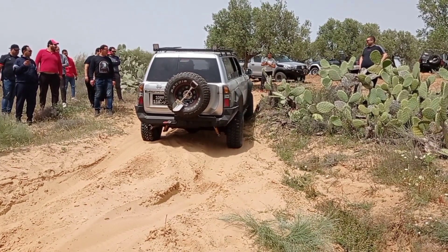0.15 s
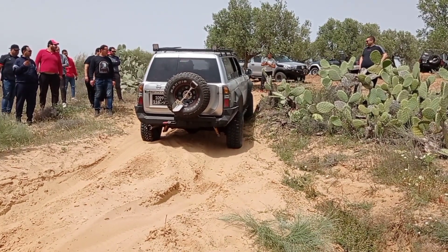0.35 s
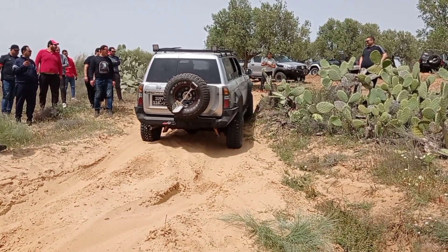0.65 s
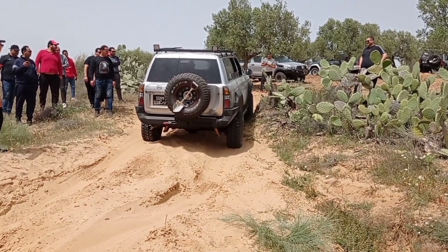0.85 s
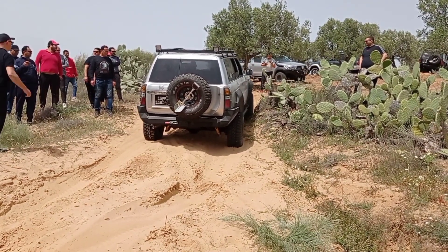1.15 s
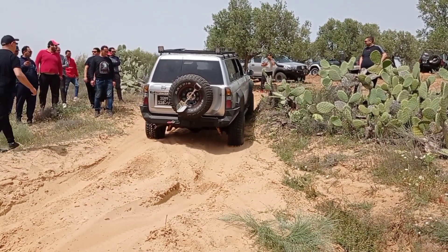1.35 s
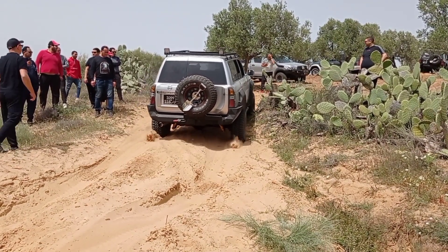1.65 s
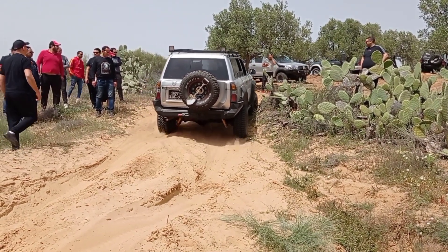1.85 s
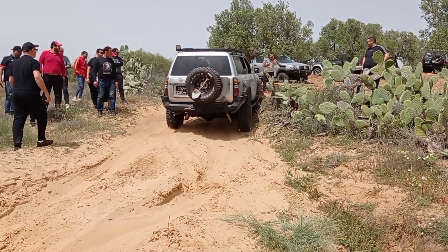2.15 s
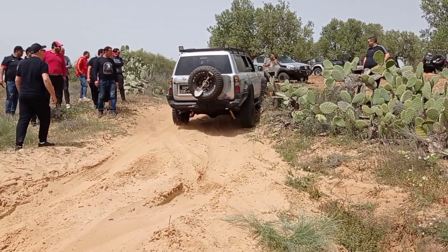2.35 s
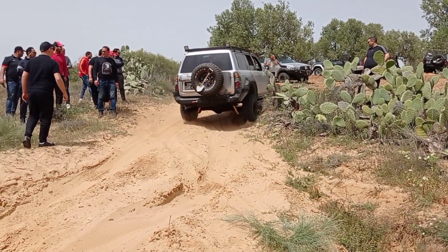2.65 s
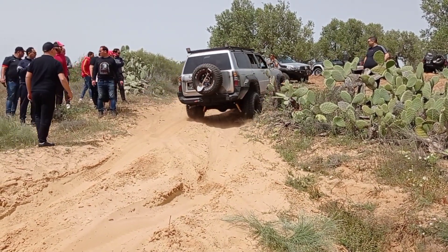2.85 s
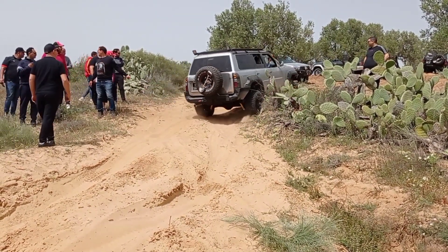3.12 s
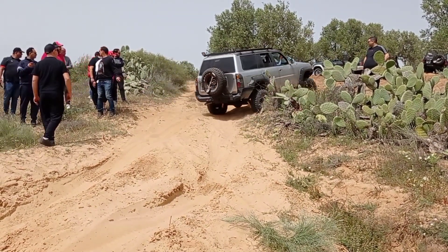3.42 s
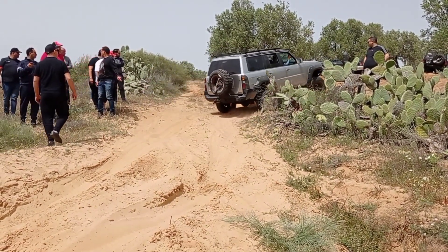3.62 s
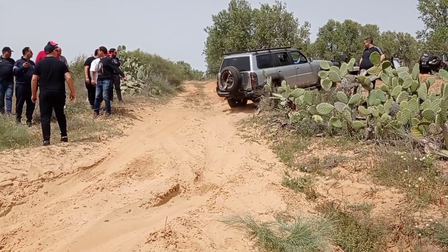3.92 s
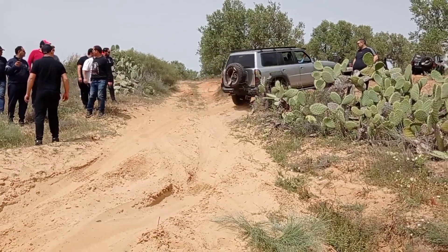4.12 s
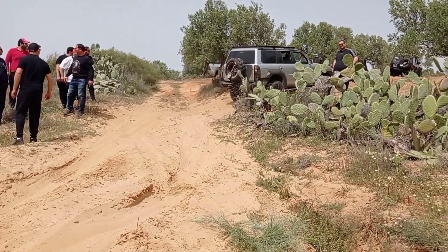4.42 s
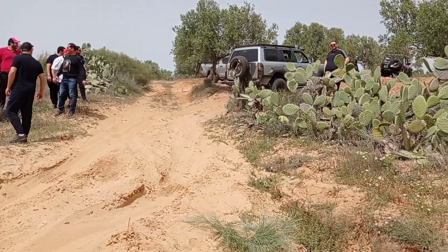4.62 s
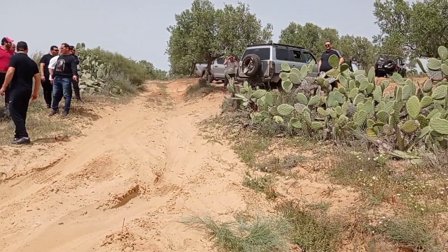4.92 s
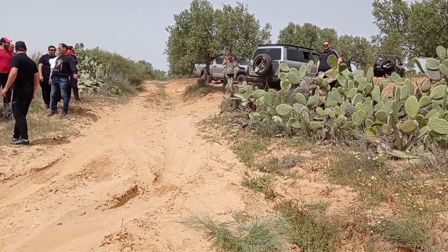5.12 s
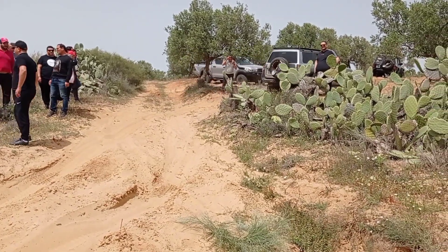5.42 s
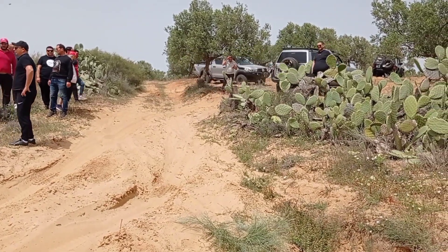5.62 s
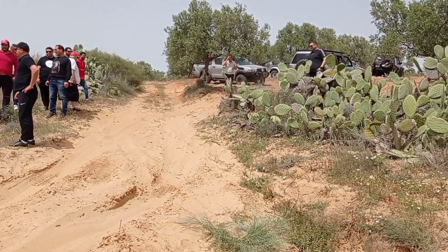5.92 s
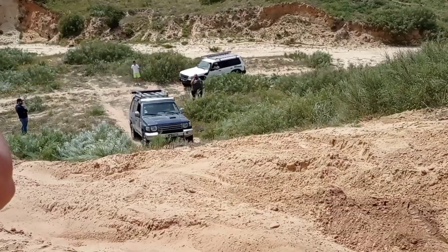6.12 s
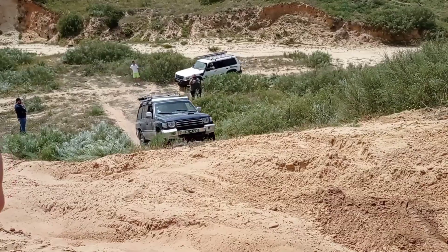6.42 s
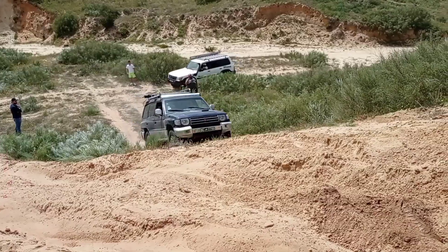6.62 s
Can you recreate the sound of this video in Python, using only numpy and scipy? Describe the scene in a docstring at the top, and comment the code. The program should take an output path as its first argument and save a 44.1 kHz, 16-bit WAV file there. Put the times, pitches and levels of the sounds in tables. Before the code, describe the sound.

An off-road vehicle labours up a sand track in the open air, its exhaust booming and its engine clattering at high, surging revs while the tyres spray sand. Wind rumbles and thumps on the microphone. The chassis gives one short squeak, then the revs sink and the engine fades. A second vehicle, farther away, lugs at low revs and accelerates uphill towards the listener with two faint ticks.

```python
"""A six-cylinder off-roader labours up a sand track at high revs: the exhaust booms, the engine
clatters, the tyres throw sand, wind buffets the microphone. From 1.35 s it turns side-on; at 2.7 s
the chassis squeaks; from 3.9 s it passes behind cactus and eases off. At 5.8 s a second one, farther
away, lugs at low revs; from 6.3 s it accelerates uphill towards the listener, with two diesel ticks."""
import sys
import numpy as np
from scipy import signal
from scipy.fft import rfft, irfft, next_fast_len
from scipy.io import wavfile
from scipy.ndimage import uniform_filter1d, map_coordinates

SR = 44100
rng = np.random.default_rng(int(sys.argv[2]) if len(sys.argv) > 2 else 0)


def materialize(psi):
    """Save the field psi as 16-bit PCM at rate SR to the path in sys.argv[1].

    A 1-D psi becomes a single channel; in a 2-D psi each row is a channel.
    """
    bounded = np.clip(np.atleast_2d(psi).T, -1, 1)
    quanta = np.round(bounded * 32767).astype(np.int16)
    wavfile.write(sys.argv[1], SR, quanta)


N = 298116

# Engine load, drives machinery and sand: t/s, level/dB
LOAD = [(0.0, -37), (0.43, -33.5), (0.66, -36), (0.92, -36), (1.2, -40.5), (1.75, -36.5), (1.98, -39),
        (2.28, -35), (2.5, -38), (2.92, -34), (3.54, -34.5), (3.75, -40), (4.12, -40), (4.95, -48),
        (5.21, -46), (5.65, -57), (6.4, -54.5), (6.76, -45)]
TURN_S = (1.35, 1.33)  # swing side-on: start, duration
SHADOW_S = (3.94, 1.0)  # slip behind cactus: start, duration; the loss stays for the distant car


def amp(db):
    """Decibels to gain."""
    return 10 ** (np.asarray(db) / 20)


def unit(x):
    """Scale to rms 1."""
    return x / np.sqrt(np.mean(x ** 2) + 1e-20)


def clock():
    """Sample times in s."""
    return np.arange(N) / SR


def curves(rows):
    """Per-sample values of each column after the time."""
    times_s, *cols = np.transpose(rows)
    return [np.interp(clock(), times_s, col) for col in cols]


def ease(start_s, length_s):
    """Smooth step, 0 to 1."""
    return np.sin(np.pi / 2 * np.clip((clock() - start_s) / length_s, 0, 1)) ** 2


def bump(at_s, half_s):
    """Gaussian envelope, peak 1."""
    return np.exp(-((clock() - at_s) / half_s) ** 2)


def bell(hz, centre_hz, half_hz):
    """Nearness to a resonance, 0 to 1."""
    return 1 / (1 + ((hz - centre_hz) / half_hz) ** 2)


def by_view(rear_db, side_db):
    """Level glide as the car turns."""
    return rear_db + (side_db - rear_db) * ease(*TURN_S)


def noise():
    """White noise."""
    return rng.standard_normal(N)


def wobble(rate_hz):
    """Smooth random curve, knots at rate_hz."""
    knots = rng.standard_normal(int(N * rate_hz / SR) + 4)
    steps = np.linspace(0, len(knots) - 1, 10 * len(knots))
    return np.interp(clock() * rate_hz, steps, map_coordinates(knots, [steps]))


def filtered(x, response):
    """Apply a frequency response."""
    size = next_fast_len(len(x) + 8192)
    return irfft(rfft(x, size) * response(np.fft.rfftfreq(size, 1 / SR)), size)[:len(x)]


def coloured(x, spectrum):
    """Shape x by rows of f/Hz, level/dB; rms 1."""
    points_hz, db = np.transpose(spectrum)
    return unit(filtered(x, lambda hz: amp(np.interp(np.log(hz + 1), np.log(points_hz), db))))


def patchy(x, depth_db, size=512):
    """Shifting reflections: narrow bands swell and fade independently."""
    bands = signal.stft(x, nperseg=size)[2]
    field = uniform_filter1d(rng.standard_normal(bands.shape), size=2, axis=0)
    for _ in range(2):
        field = uniform_filter1d(field, size=SR // (4 * size) + 1, axis=1)
    return signal.istft(bands * amp(depth_db * unit(field)), nperseg=size)[1][:N]


def firings(rate_hz, flywheel_s=0.0904, flutter=0.00198):
    """Running firing count; the flywheel smooths the speed."""
    smooth_hz = uniform_filter1d(rate_hz, int(flywheel_s * SR), mode="nearest")
    return np.cumsum(smooth_hz * (1 + flutter * wobble(30))) / SR


def boom(fired, tone_db, octave_db):
    """The silencer passes mainly the firing tone and its octave."""
    tone = amp(tone_db + 0.37 * wobble(24.9)) * np.sin(2 * np.pi * fired)
    octave = amp(octave_db + 0.99 * wobble(16)) * np.sin(4 * np.pi * fired)
    return np.sqrt(2) * (tone + octave)


def drone(cycle, waver_db=3.0):
    """Unequal cylinders add wavering lines, lifted by the tailpipe resonance, over rushing gas."""
    # Exhaust lines: multiple of the cycle rate, level/dB
    orders = [(3, 4), (4, 4.5), (5, 6.5), (7, 10.5), (8, 7), (10, 0.5), (11, -6), (13, -17), (14, -4.5),
              (15, 1.5), (16, -7), (17, -17), (18, 5), (19, -26), (20, 0.5), (21, -6), (22, -17.5),
              (23, -8.5), (24, -2), (26, -7), (27, -9), (30, -9)]
    # Growl as the engine is dragged down: t/s, tilt/(dB/octave)
    growl = [(0, -4), (1.2, -3.5), (2.2, 2.5), (3.4, .5), (4.6, 4), (5.8, 3.5), (6.76, 0.5)]
    tilt_db, = curves(growl)
    cycle_hz = np.gradient(cycle) * SR
    lines = np.zeros(N)
    for order, db in orders:
        tailpipe_db = 2.9 * bell(order * cycle_hz, centre_hz=500, half_hz=230)
        growl_db = tilt_db * np.log2(max(order, 8) / 16)
        gain = amp(db + tailpipe_db + growl_db + waver_db * wobble(5))
        lines += gain * np.sin(2 * np.pi * (order * cycle + rng.random()) + 0.22 * wobble(5))
    gas = coloured(noise(), [(120, -22), (280, -20), (450, 4.5), (650, -0.5), (1000, -9.5), (2500, -69)])
    return unit(lines) + amp(-14) * gas


def climber(fired, rate_hz, droning, pull_db_s_per_hz=0.0486, pull_lag_s=0.44):
    """First exhaust: bank beat and drone follow the boom; the drone also swells with rising revs."""
    # Firing tone: t/s, level/dB
    tone = [(0.0, -18), (0.5, -14.5), (0.59, -19), (0.89, -22), (1.11, -17.5), (1.42, -26), (1.5, -20),
            (2.32, -15.5), (2.52, -20.3), (3.25, -19), (3.58, -15.5), (3.7, -20), (3.85, -19), (4.08, -20),
            (4.38, -16), (4.64, -16), (4.73, -22.5), (4.98, -24.5), (5.24, -19), (5.8, -39.5)]
    # Its octave: t/s, level/dB
    octave = [(0, -42.5), (2.4, -46), (2.75, -35), (3.05, -40), (3.45, -35), (3.68, -35), (3.84, -21),
              (4.08, -35), (4.25, -29), (4.64, -28.5), (4.78, -46.5), (5.8, -40)]
    tone_db, = curves(tone)
    push_db = tone_db + 18  # re full boom
    rise_hz_per_s = uniform_filter1d(np.gradient(rate_hz) * SR, int(pull_lag_s * SR), mode="nearest")
    beat = np.sqrt(2) * np.sin(3 * np.pi * fired)  # two unequal banks: 1.5 x firing rate
    beat_db = by_view(-37.5, -33) + 0.69 * push_db + 1.6 * wobble(10)
    drone_db = by_view(-35, -31) + 0.94 * push_db + pull_db_s_per_hz * rise_hz_per_s
    return boom(fired, tone_db, curves(octave)[0]) + amp(beat_db) * beat + amp(drone_db) * droning


def cycle_pattern(cycle, drift_hz, size=512):
    """Slowly drifting random pattern, repeated each engine cycle."""
    patterns = rng.standard_normal((int(N * drift_hz / SR) + 4, size))
    return unit(map_coordinates(patterns, [clock() * drift_hz, cycle % 1 * size], mode="grid-wrap"))


def knocks(cycle, fired, repeat, depth, uneven):
    """Partly cyclic rattle, swelling at each firing and with the louder cylinders."""
    cyclic = np.sqrt(repeat) * cycle_pattern(cycle, drift_hz=3)
    loose = np.sqrt(1 - repeat) * coloured(noise(), [(5000, 6), (7000, -41)])
    swell = depth * np.cos(2 * np.pi * fired) + uneven * cycle_pattern(cycle, drift_hz=2.52, size=24)
    return (cyclic + loose) * np.exp(swell)


def panels(cycle, rate_hz, critical_hz=157.5):
    """Engine lines sweep through body panel resonances, hardest at the critical firing rate."""
    # Panel modes: f/Hz, width/Hz, level/dB
    modes = [(443.3, 45, 5), (1321, 106, -0.5), (1936, 37, -6.5), (2380, 116, -5.5)]

    def response(hz):
        return sum(amp(db) * (1j * hz * width_hz / (mode_hz ** 2 - hz ** 2 + 1j * hz * width_hz)) ** 2
                   for mode_hz, width_hz, db in modes)

    phase_turns = np.cumsum(rng.standard_normal(256) ** 2)
    period = irfft(np.exp(2j * np.pi * phase_turns), 2048)  # equally strong lines
    shake = np.interp(cycle % 1, np.arange(len(period)) / len(period), period) * amp(2.6 * wobble(12))
    level_db = by_view(-6.5, -9.5) + 14 * bell(rate_hz, critical_hz, half_hz=3.6)
    return amp(level_db) * unit(filtered(shake, response))


def machinery(cycle, fired, rate_hz, shadow_db=-1):
    """Clatter, rasp and panel ringing follow the load; the clatter changes colour in the turn."""
    # Clatter from under the tail: f/Hz, level/dB
    rear_eq = [(450, -35), (650, -10), (800, -1.5), (1020, -7), (1300, -2), (1510, 4.5), (1610, -14),
               (1690, -10), (1790, -3), (2000, -3.5), (2150, -4), (3000, -2.5), (5000, -64)]
    # Clatter from the wheel arch: f/Hz, level/dB
    flank_eq = [(480, -3.5), (680, -11.5), (800, -1), (950, 0), (1240, -1), (1400, -1), (1650, -1),
                (1820, -6), (2000, -4), (2400, -7.5), (3200, -19), (5000, -30)]
    # Fan and injector rasp: f/Hz, level/dB
    rasp_eq = [(1700, -48), (2100, -13), (2420, -3), (2700, -0.5), (3000, -0.5), (3400, 4), (3800, -1.5),
               (4300, -10.5), (5200, -27), (9000, -50)]
    rear = patchy(knocks(cycle, fired, repeat=0.5, depth=0.12, uneven=0.17), depth_db=1.5, size=1024)
    flank = patchy(knocks(cycle, fired, repeat=0.7, depth=0.14, uneven=0.17), depth_db=3, size=1024)
    rasp = patchy(knocks(cycle, fired, repeat=0.4, depth=0.07, uneven=0.15), depth_db=1.8)
    rasp = amp(by_view(-1.7, -3) + 0.53 * wobble(10)) * coloured(rasp, rasp_eq)
    side = ease(*TURN_S)
    clatter = np.sqrt(1 - side) * coloured(rear, rear_eq) + np.sqrt(side) * coloured(flank, flank_eq)
    body = amp(by_view(-0.7, 2.2)) * clatter + panels(cycle, rate_hz)
    return amp(curves(LOAD)[0]) * (rasp + amp(shadow_db * ease(*SHADOW_S)) * body)


def engines(handover_s=5.8, cylinders=6):
    """Exhaust and machinery; the first engine gives way to the second in 10 ms."""
    # Surge and sag as the tyres slip and bite: t/s, firing rate/Hz
    climber_revs = [(0.0, 172.2), (0.28, 186.1), (0.57, 173.2), (1.02, 183), (1.23, 174.4), (1.54, 173.1),
                    (2.11, 160.1), (2.38, 170.1), (2.66, 146.1), (2.99, 160.1), (3.22, 145.2),
                    (3.55, 153.7), (3.84, 129.9), (4.19, 154.1), (4.51, 130), (4.74, 135.9), (4.99, 118.4),
                    (5.36, 131.6), (5.56, 105.9), (5.8, 85.0)]
    # Lugging, then accelerating: t/s, firing rate/Hz
    follower_revs = [(5.8, 85), (6.05, 75.54), (6.22, 73.96), (6.42, 80.7), (6.76, 128)]
    first = uniform_filter1d((clock() < handover_s) * 1., SR // 100, mode="nearest")
    rate_hz = first * curves(climber_revs)[0] + (1 - first) * curves(follower_revs)[0]
    fired = firings(rate_hz)
    cycle = fired / cylinders
    droning = drone(cycle)
    exhaust = first * climber(fired, rate_hz, droning) + (1 - first) * follower(fired, rate_hz, droning)
    return exhaust + machinery(cycle, fired, rate_hz)


def sand(grain_db=1.0, full_load_db=-35):
    """Spinning tyres throw a grainy spray that follows the load."""
    # Sand spray: f/Hz, level/dB
    spray_eq = [(1800, -23.5), (3500, -1.5), (4800, -3.5), (5600, -2.5), (6400, -0.5), (7500, -3),
                (8500, -7), (10000, -15), (12000, -24.5), (15000, -45)]
    grains = patchy(noise(), depth_db=2) * amp(grain_db * wobble(500) + 0.25 * wobble(40))
    spray = coloured(grains, spray_eq)
    # Thin sand hiss near 10 kHz, plus a microphone resonance near 14.75 kHz
    hiss = coloured(noise(), [(7000, -24), (10000, 4), (12000, -3), (13900, -12), (14300, -4),
                              (14750, 10.5), (15500, -7)])
    load_db, = curves(LOAD)
    shadow = ease(*SHADOW_S)
    spray_db = by_view(-6, -3.5) + load_db - 2 * shadow
    hiss_db = by_view(-57, -53.5) + 1.3 * (load_db - full_load_db) - 12 * shadow
    return amp(spray_db) * spray + amp(hiss_db) * hiss


def wind(breeze_db=-38, lump_db=3.0, thump_s=0.0028, crest_db=20.5):
    """Gusts rumble on the microphone over a breeze; the strongest eddies strike as dull thumps."""
    # Gusts: t/s, level/dB, half length/s
    gusts = [(0.493, -25.5, 0.21), (0.886, -24, 0.083), (1.55, -28, 0.26), (2.375, -27.5, 0.11),
             (2.85, -40, 0.088), (5.703, -40, .12), (6.21, -24, .07), (6.69, -26.5, .16)]
    # Rumble: f/Hz, level/dB
    rumble_eq = [(20, -29), (40, -32), (60, -14.5), (90, -6.5), (150, -3), (250, -8), (350, -13.5),
                 (600, -19.5), (1200, -42), (3000, -78), (9000, -110)]
    # Eddy strikes: t/s, peak level/dB
    eddies = [(0.573, -11.5), (0.583, -12), (0.833, -17), (0.88, -16), (1.403, -20.5), (1.503, -18),
              (1.624, -16), (5.804, -15), (6.08, -17.5), (6.104, -18), (6.121, -11.5), (6.165, -18.5),
              (6.185, -12.5), (6.204, -11), (6.247, -17), (6.468, -13), (6.623, -17)]
    # One thump: f/Hz, level/dB
    thump_eq = [(30, -27), (100, -3.5), (230, 1), (450, -0.5), (700, -11), (1100, -24), (1700, -38),
                (5000, -74), (10000, -105)]
    power = amp(breeze_db) ** 2 + sum(amp(db) ** 2 * bump(at_s, half_s) for at_s, db, half_s in gusts)
    rumble = np.sqrt(power) * coloured(noise() * amp(lump_db * wobble(70)), rumble_eq)
    thumps = np.zeros(N + SR)
    age_s = np.arange(SR // 10) / SR
    for at_s, peak_db in eddies:
        puff = coloured(rng.standard_normal(len(age_s)), thump_eq) * age_s * np.exp(-age_s / thump_s)
        thumps[round(at_s * SR):][:len(puff)] += amp(peak_db - crest_db) * unit(puff)
    return rumble + thumps[:N]


def spurts_and_ticks():
    """Short bright bursts: two sand spurts, then two sharp diesel ticks from the second engine."""
    # Bursts: t/s, level/dB, half length/s
    bursts = [(.49, -42, .018), (2.28, -43, .09), (6.472, -55, .002), (6.546, -56, .003)]
    bright = coloured(noise(), [(3500, -31), (5000, 4), (6300, -4), (7500, 2), (9000, -13), (14000, -42)])
    return bright * sum(amp(db) * bump(at_s, half_s) for at_s, db, half_s in bursts)


def squeak(at_s=2.748, pitch_hz=2960, level_db=-37, half_s=0.014):
    """Something on the chassis rubs: one rough chirp."""
    phase = 2 * np.pi * pitch_hz * clock() + 0.6 * wobble(250)
    chirp = sum(amp(db) * np.sin(harmonic * phase) for harmonic, db in [(1, -1), (2, -1), (3, -8)])
    return amp(level_db) * bump(at_s, half_s) * chirp


def follower(fired, rate_hz, droning, pedal_boom_db=10.5, pedal_drone_db=17):
    """Second exhaust: swells as the pedal goes down and the tone climbs into the silencer's pass band."""
    # Silencer output while lugging: f/Hz, level/dB
    silencer = [(75, -46), (85, -38.5), (106, -27.5), (128, -26.5), (150, -31), (168, -32), (212, -38),
                (255, -45)]
    pedal = ease(start_s=6.29, length_s=0.29)
    tone_db = np.interp(rate_hz, *np.transpose(silencer)) + pedal_boom_db * pedal
    octave_db = np.interp(2 * rate_hz, *np.transpose(silencer)) + pedal_boom_db * pedal
    return boom(fired, tone_db, octave_db) + amp(-50 + pedal_drone_db * pedal) * droning


def scene():
    """Open air, mono."""
    return (engines() + sand() + spurts_and_ticks() + squeak() + wind())[None]


def record(dry):
    """Brick-wall low-pass at 15.6 kHz."""
    return np.array([filtered(channel, lambda hz: hz < 15600) for channel in dry])


dry = scene()
out = record(dry)
materialize(out)
```